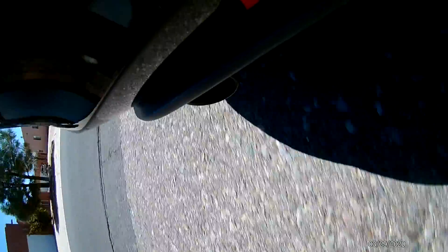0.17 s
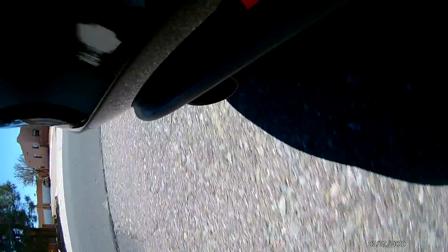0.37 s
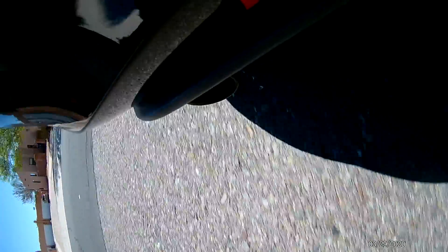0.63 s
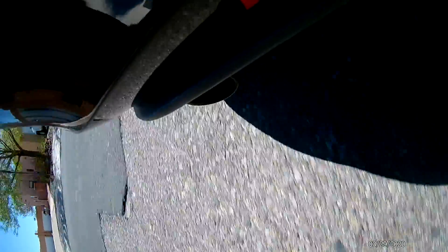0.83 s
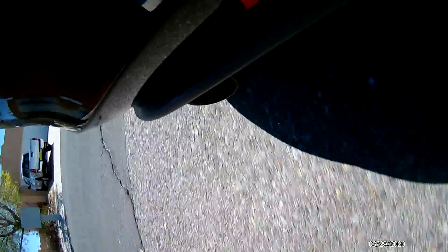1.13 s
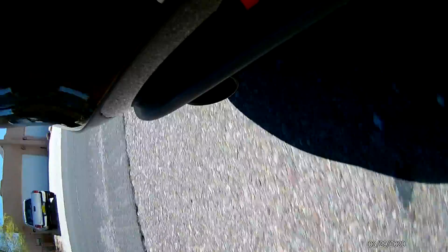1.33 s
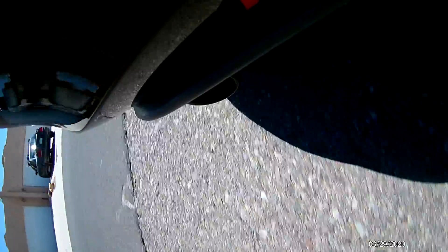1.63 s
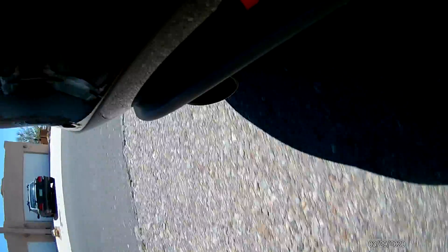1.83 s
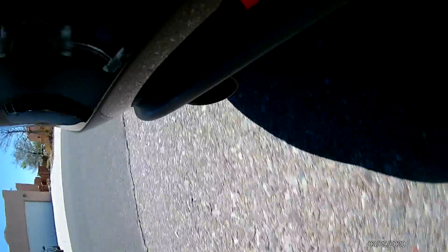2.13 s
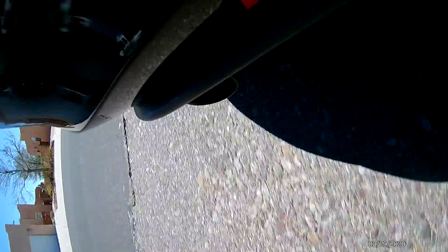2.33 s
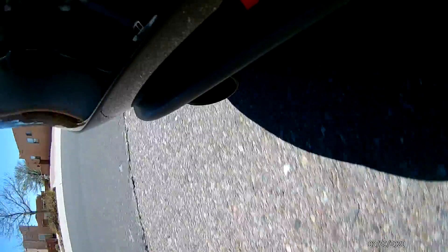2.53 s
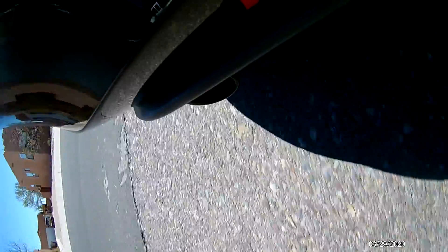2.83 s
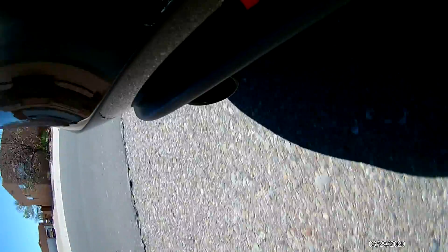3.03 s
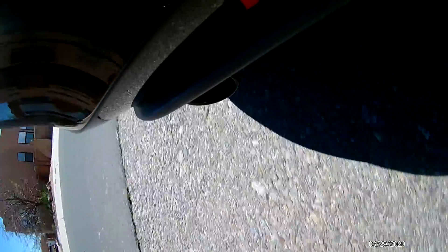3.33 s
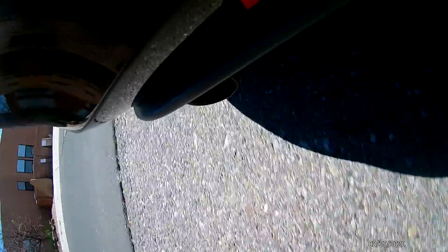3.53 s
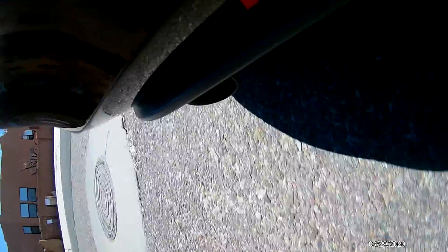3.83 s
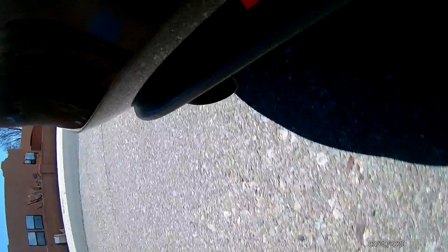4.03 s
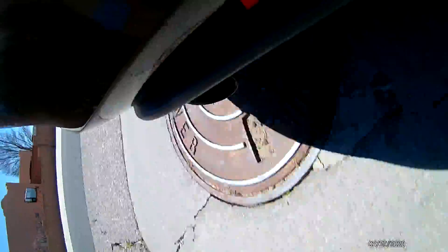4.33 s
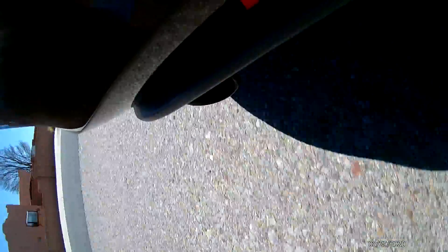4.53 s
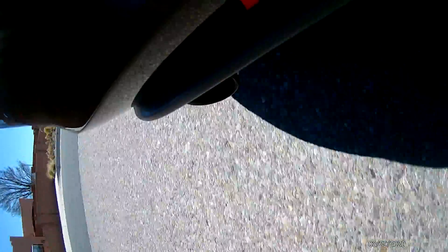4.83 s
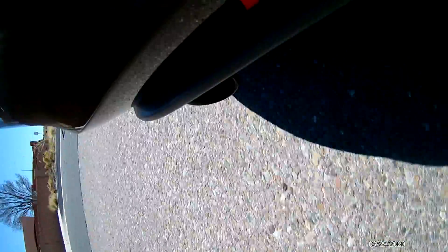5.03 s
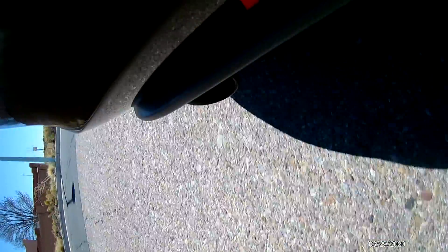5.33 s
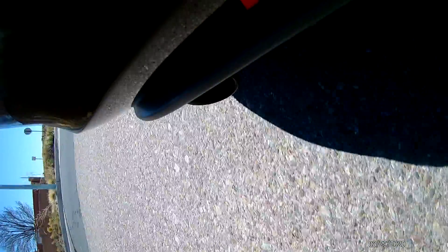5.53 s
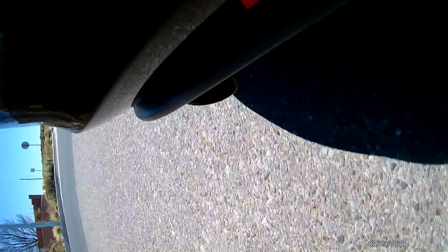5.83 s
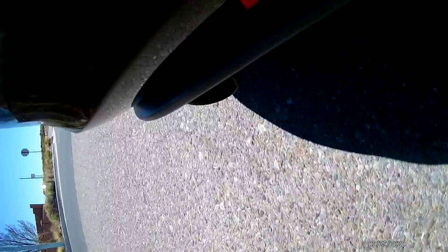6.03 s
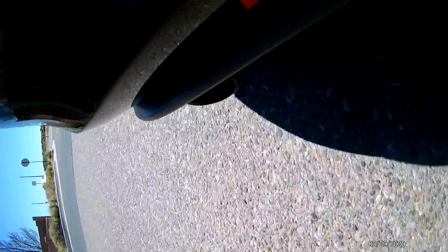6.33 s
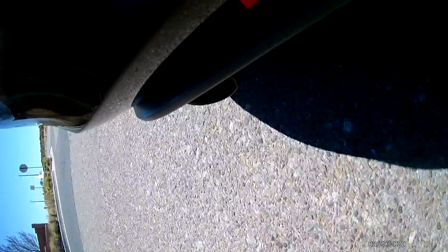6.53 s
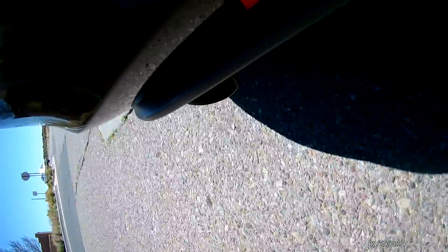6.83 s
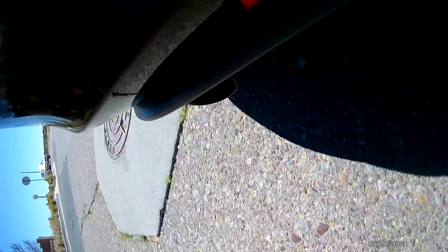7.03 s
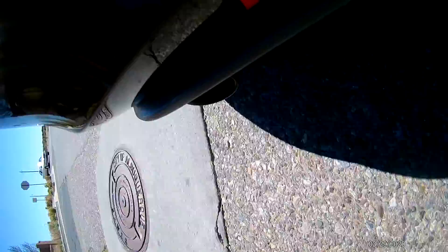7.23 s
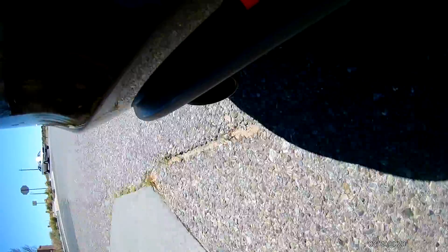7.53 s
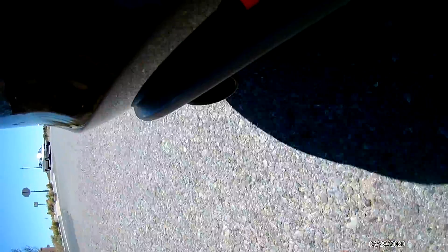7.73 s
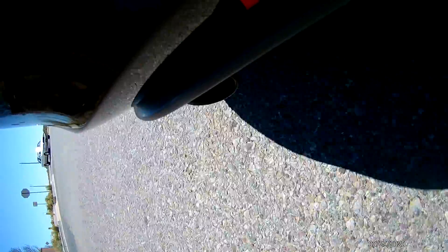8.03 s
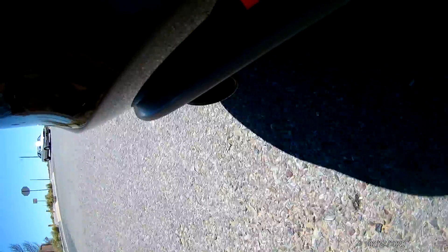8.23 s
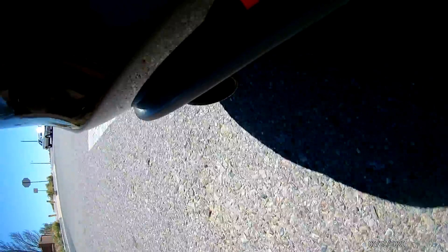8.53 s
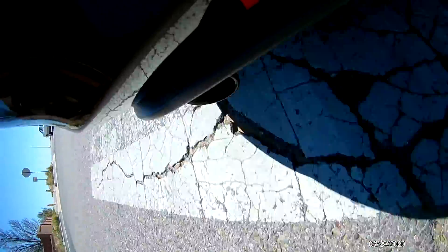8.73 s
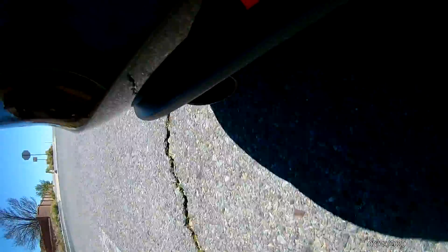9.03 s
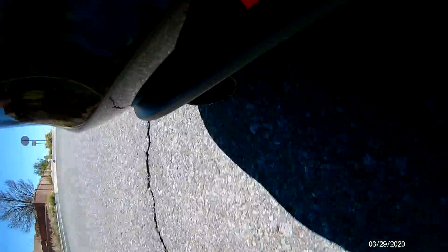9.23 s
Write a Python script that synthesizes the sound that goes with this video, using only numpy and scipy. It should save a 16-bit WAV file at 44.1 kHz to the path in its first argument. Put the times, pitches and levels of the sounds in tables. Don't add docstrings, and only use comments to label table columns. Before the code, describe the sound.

An open car exhaust heard from a dull, enclosed microphone beside the pipe. Tyre roar and body rumble accompany closed-throttle burble, metallic pipe ringing, dry sucking pulses, pops and airy chuffs, all slowing down. Steady low idle beats follow with little road noise. Finally the engine surges, with cracking shock fronts and thick gas rasp, into clipped, hard acceleration.

```python
import sys
import numpy as np
from scipy import signal
from scipy.fft import rfft, irfft, next_fast_len
from scipy.io import wavfile
from scipy.ndimage import uniform_filter1d

SR = 44100
rng = np.random.default_rng(int(sys.argv[2]) if len(sys.argv) > 2 else 0)


def convert_level_to_amplitude(level_db):
    exponent = np.asarray(level_db, float) / 20
    return 10 ** exponent


def put_to_file(sound):
    columns = np.atleast_2d(sound).T
    safe = np.clip(columns, -1, 1)
    whole_steps = np.round(safe * 32767)
    wavfile.write(sys.argv[1], SR, whole_steps.astype(np.int16))


N = 414099
T = np.arange(N) / SR
HZ = np.fft.rfftfreq(next_fast_len(N + SR), 1 / SR) + 1e-6

# (time [s], firing rate [Hz])
ENGINE_SPEED = [(0.0, 78.11), (0.9, 74.47), (2.05, 65.39), (2.7, 60.37), (3.74, 49.8), (4.75, 39.83),
                (5.1, 36.92), (6.22, 26.24), (6.67, 28.58), (7.11, 25.18), (7.29, 25.1), (7.58, 30.79),
                (7.9, 31.02), (8.0, 34.96), (8.2, 54.52), (8.71, 54.78), (8.88, 57.0), (9.39, 77.46)]
# (start [s], firing [dB], suction [dB], pipe ring [dB], gas rasp [dB])
FUEL_STATES = [(0, -21, -11, -27, -50), (.55, -24.5, -15, -15, -39), (1.19, -35.5, -21, -11.5, -26.5),
               (2.08, -32, -14, -17.5, -55.5), (2.66, -42, -9.5, -26, -27), (3.15, -36, -11, -28.5, -27.5),
               (3.8, -38, -12, -26.5, -30.5), (4.85, -24, -21.5, -25.5, -36),
               (5.15, -26.5, -30, -27.5, -57), (6.2, -16, -50, -31, -41.5),
               (7.45, -13.5, -43, -29.5, -40.5), (7.78, -15.5, -48.5, -38, -47.5),
               (7.99, -9, -33, -21, -22), (8.12, -5, -29.5, -26.5, -18)]
# (time [s], scatter [dB])
FIRING_SCATTER = [(0, 4), (4.2, 4), (5.0, 4.5), (6.1, 3.5), (6.35, .8), (7.9, .6), (9.39, .5)]
# (centre [Hz], width [Hz], level [dB])
PIPE_RING = [(143, 15, -3.5), (188.4, 11, 8.5), (223.9, 12, 5.5), (280.3, 15, 3), (331, 38, -8),
             (367, 9.6, -19.5), (486, 92, -8), (560, 28, -4.5)]
# (centre [Hz], width [Hz], level [dB], steady share between puffs [ratio])
GAS_RASP = [(322.8, 160, -4, 1), (514.5, 97, -3, 0.34), (657.6, 180, 4.5, 0.19), (891, 250, 1.95, 0.47),
            (1486, 400, -8, 0.49), (2240, 240, -26.5, 0.17), (3980, 330, -48, 3.7)]
# (frequency [Hz], density [dB per Hz])
TYRE_SPECTRUM = [(250, -30), (420, -7.5), (605, -1), (800, -5), (910, -6), (1000, -3), (1380, -1),
                 (1660, -7), (1930, -15.5), (2460, -18), (3050, -35.5), (4000, -35), (5000, -40),
                 (7200, -61)]
# (time [s], speed [m/s])
ROAD_SPEED = [
    (0, 10.67),
    (1.5, 9.37),
    (6.2, 3.52),
    (7.9, 2.1),
]
# (time [s], peak [dB])
FUEL_POPS = [(0.196, -9), (0.602, -17), (0.66, -15), (0.822, -8), (1.097, -4.5), (1.431, -5.5), (1.498, 0),
             (1.563, -10.5), (1.779, 0), (2.046, 1.5), (2.128, -5.5), (2.68, -6), (4.197, -7.5),
             (4.297, -12), (4.749, -14), (4.907, -4.5), (4.963, -8), (5.068, -10), (5.92, -28),
             (6.245, -17)]
# (time [s], peak [dB], whistle [Hz])
GAS_CHUFFS = [(2.681, -5, 860), (2.818, -10, 820), (2.902, -7, 938), (3.407, -21.5, 674), (3.558, -13, 658),
              (3.677, -12.5, 765), (3.756, -19, 710), (4.005, -7, 595), (4.046, -10, 574),
              (4.136, -19, 925), (4.199, -4, 1233), (4.402, -15, 645), (4.447, -15, 901), (4.499, -8, 624),
              (4.542, -11, 645), (4.642, -18.5, 597), (4.691, -20, 580), (4.895, -4, 641),
              (6.548, -13, 686), (6.69, -14, 644), (6.762, -16, 860), (6.834, -18, 770),
              (7.297, -32.5, 633), (7.448, -19, 670), (7.517, -24, 691), (7.583, -8.5, 730),
              (7.711, -19, 786), (7.778, -24, 683), (7.966, -19, 782), (7.997, -19, 703)]
# (firing [dB], suction [dB], pipe ring [dB], gas rasp [dB])
BOOST_GAIN_DB = (5.5, -3, 16, 5.5)

PIPE_LOSS_HZ = 410
HOT_MS, HOT_ECHO = 15.8, 0.38
COOL_MS, COOL_ECHO = 17.58, 0.37
BOOST_MS, BOOST_ECHO = 10, 0.078
STATE_CHANGE_CYCLES = 4.9
THROTTLE_S, BOOST_FROM_HZ, BOOST_FULL_HZ = 8, 57, 64.4
TYRE_DB, TYRE_DB_PER_DECADE, TYRE_REF_MPS = -20, 39.5, 11
HISS_DB = -78.5


def curves(table, at_s):
    s, *columns = np.transpose(table)
    return [np.interp(at_s, s, column) for column in columns]


def through(x, response):
    size = 2 * len(HZ) - 2
    return irfft(rfft(x, size) * response, size)[:N]


def band(centre_hz, width_hz):
    damping = 1j * HZ * width_hz
    return damping / (centre_hz ** 2 - HZ ** 2 + damping)


def delay(ms):
    return np.exp(-2j * np.pi * HZ * ms / 1000)


def puff(ms):
    return np.exp(-0.5 * (2 * np.pi * HZ * ms / 1000) ** 2)


def pipe(ms, echo):
    return 1 / (1 - echo * delay(ms) / (1 + 1j * HZ / PIPE_LOSS_HZ))


def unit(response, rate_hz=50):
    return response / np.sqrt(np.mean(abs(response) ** 2) * rate_hz / SR)


def clicks(times_s, sizes):
    at = np.clip(times_s * SR, 0, N - 2)
    whole = at.astype(int)
    out = np.zeros(N)
    np.add.at(out, whole, sizes * (1 - at + whole))
    np.add.at(out, whole + 1, sizes * (at - whole))
    return out


def walk(rate_hz):
    hold = int(SR / rate_hz)
    steps = np.repeat(rng.standard_normal(N // hold + 1), hold)
    return uniform_filter1d(uniform_filter1d(steps, hold), hold)[:N]


def cycles():
    turns = np.cumsum(curves(ENGINE_SPEED, T)[0]) / SR
    return np.interp(np.arange(0.27, turns[-1]), turns, T)


def cycle_gain(opens):
    return np.sqrt(50 / curves(ENGINE_SPEED, opens)[0])


def alternate(opens):
    return (-1) ** np.arange(len(opens))


def boost(at_s):
    hz = curves(ENGINE_SPEED, at_s)[0]
    spool = np.clip((hz - BOOST_FROM_HZ) / (BOOST_FULL_HZ - BOOST_FROM_HZ), 0, 1)
    return (at_s > THROTTLE_S) * spool


def fuelling(at_s):
    start, *levels = np.transpose(FUEL_STATES)
    half_s = STATE_CHANGE_CYCLES / 2 / curves(ENGINE_SPEED, start)[0]
    knots = np.ravel([start - half_s, start + half_s], "F")
    out = []
    for db, more_db in zip(levels, BOOST_GAIN_DB):
        held = np.repeat(np.r_[db[0], db], repeats=2)[1:-1]
        out.append(np.interp(at_s, knots, held) + more_db * boost(at_s))
    return out


def blow_response():
    ends = 1 - 0.51 * delay(-3.5) - 0.63 * delay(3.57) - 0.28 * delay(7.0) + 0.026 * delay(16.0)
    return unit(puff(1.35) * ends * pipe(HOT_MS, HOT_ECHO))


def ring_response():
    modes = sum(convert_level_to_amplitude(db) * band(hz, width_hz) for hz, width_hz, db in PIPE_RING)
    return unit(-puff(0.6) * delay(-3.0) * modes)


def blow_sizes(opens, chance):
    scatter_db = curves(FIRING_SCATTER, opens)[0] * chance[1]
    return cycle_gain(opens) * convert_level_to_amplitude(fuelling(opens)[0] + scatter_db)


def firings(opens, chance):
    sizes = blow_sizes(opens, chance) * (1 - boost(opens))
    return through(clicks(opens, sizes), blow_response())


def suction(opens, chance):
    pull = 0.15 * delay(-10) - delay(-4.0) + 0.59 * delay(0.7)
    suck = puff(1.0) * (1 + 1.1 * delay(2.67)) * pull * (1 + 0.73 * band(375, 70))
    sizes = cycle_gain(opens) * convert_level_to_amplitude(fuelling(opens)[1] + 0.6 * chance[2])
    return through(clicks(opens, sizes), unit(suck * pipe(COOL_MS, COOL_ECHO)))


def ringing(opens, chance):
    sizes = cycle_gain(opens) * convert_level_to_amplitude(fuelling(opens)[2] + 1.5 * chance[0])
    return through(clicks(opens, sizes), ring_response())


def shocks(opens, chance):
    db = 1.94 * fuelling(opens)[0] - 12 + 1.2 * chance[3] + 1.2 * alternate(opens)
    return through(clicks(opens - 0.0017, convert_level_to_amplitude(db)), unit(band(140, 420) * puff(0.21)))


def gas(opens, chance):
    cylinder_db = fuelling(opens)[-1] + 1.6 * alternate(opens)
    spurt = unit(1 / (1 + 1j * HZ / 160) ** 2, 59)
    stream = convert_level_to_amplitude(fuelling(T)[-1])
    out = 0
    for k, (centre_hz, width_hz, db, steady) in enumerate(GAS_RASP):
        luck_db = 1.2 * chance[3] + 1.7 * chance[4 + k]
        sizes = convert_level_to_amplitude(cylinder_db + luck_db) * cycle_gain(opens)
        flow = through(clicks(opens - 0.0057, sizes), spurt) + steady * stream
        colour = band(centre_hz, width_hz) ** 2
        colour = colour / np.sqrt(np.mean(abs(colour) ** 2))
        out = out + convert_level_to_amplitude(db) * through(flow * rng.standard_normal(N), colour)
    return convert_level_to_amplitude(-7.5) * out


def tread():
    hz, db = np.transpose(TYRE_SPECTRUM)
    colour = convert_level_to_amplitude(np.interp(np.log(HZ), np.log(hz), db))
    swell = walk(1.9)
    out = 0
    for centre_hz in 300 * 2 ** np.arange(0, 5, 0.5):
        share = np.clip(1 - 2 * abs(np.log2(HZ / centre_hz)), 0, 1) ** 0.5
        flicker = convert_level_to_amplitude(0.48 * swell + 0.99 * walk(18))
        out = out + flicker * through(rng.standard_normal(N), colour * share)
    return out / out.std()


def rumble():
    out = through(rng.standard_normal(N), band(71, 280) ** 2 * puff(0.25))
    out = out * convert_level_to_amplitude(2.2 * walk(11))
    return convert_level_to_amplitude(4) * out / out.std()


def tyres():
    speed_mps = curves(ROAD_SPEED, T)[0]
    db = TYRE_DB + TYRE_DB_PER_DECADE * np.log10(speed_mps / TYRE_REF_MPS)
    return convert_level_to_amplitude(db) * (tread() + rumble())


def whine():
    out = through(rng.standard_normal(N), band(3950, 1300) ** 2)
    return convert_level_to_amplitude(-67) * out / out.std()


def pops():
    pop_s, pop_db = np.transpose(FUEL_POPS)
    train = clicks(pop_s + 0.004, convert_level_to_amplitude(pop_db - 11))
    return through(train, blow_response() + ring_response())


def chuffs():
    out = np.zeros(N)
    age_s = np.arange(1000) / SR
    swell = (age_s / 0.0035 * np.exp(1 - age_s / 0.003)) ** 3
    for s, db, hz in GAS_CHUFFS:
        i = int(s * SR)
        whistle = np.sin(2 * np.pi * hz * age_s + 6 * rng.random())
        out[i:i + len(age_s)] += convert_level_to_amplitude(db - 3.5) * swell * whistle
    return through(out, 1 + 0.3 * delay(HOT_MS))


def boosted_firings(opens, chance):
    ends = 1 + 0.6 * delay(1.5) - 0.75 * delay(-3.0) - 0.5 * delay(3.8)
    hot = puff(1.1) * ends * pipe(BOOST_MS, BOOST_ECHO) * (1 + 0.65 * band(190, 16))
    sizes = blow_sizes(opens, chance) * boost(opens)
    return through(clicks(opens, sizes), unit(hot))


def scene():
    opens = cycles()
    chance = rng.standard_normal((N // 500, 11))[:len(opens)].T.clip(-1.8, 1.8)
    strokes = firings(opens, chance) + suction(opens, chance) + ringing(opens, chance)
    exhaust = strokes + shocks(opens, chance) + gas(opens, chance)
    road = tyres() + whine()
    bursts = pops() + chuffs() + boosted_firings(opens, chance)
    return (exhaust + road + bursts)[None]


def top_cut(x):
    return signal.sosfilt(signal.butter(12, 15800, fs=SR, output="sos"), x)


def record(dry):
    housing = puff(0.035) * 1j * HZ / (30 + 1j * HZ)
    x = np.clip(through(dry[0], housing), -0.91, 0.91)
    coupling = 1j * HZ / (14 + 1j * HZ) / (1 + 1j * HZ / 7000)
    x = np.clip(through(x, coupling), -1, 1)
    x = x + convert_level_to_amplitude(HISS_DB) * rng.standard_normal(N)
    return top_cut(x[None])


dry = scene()
out = record(dry)
put_to_file(out)
```